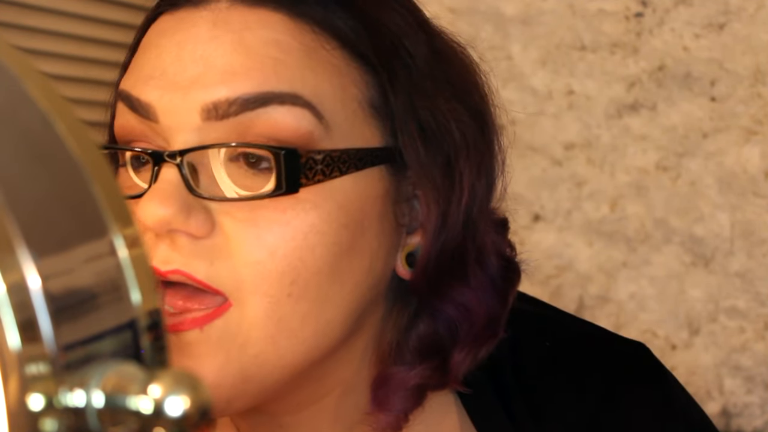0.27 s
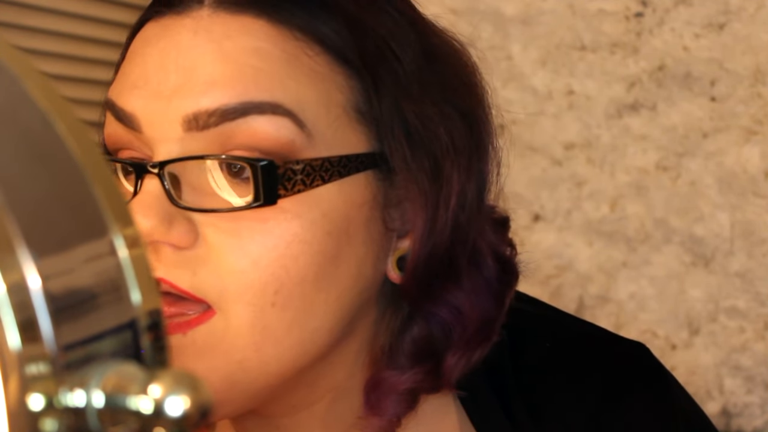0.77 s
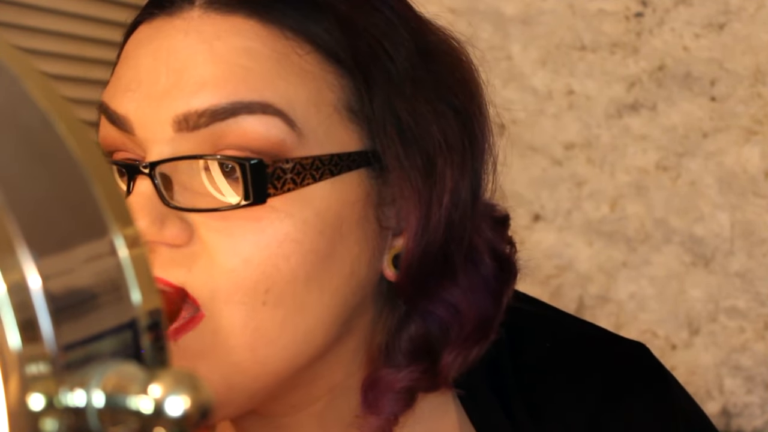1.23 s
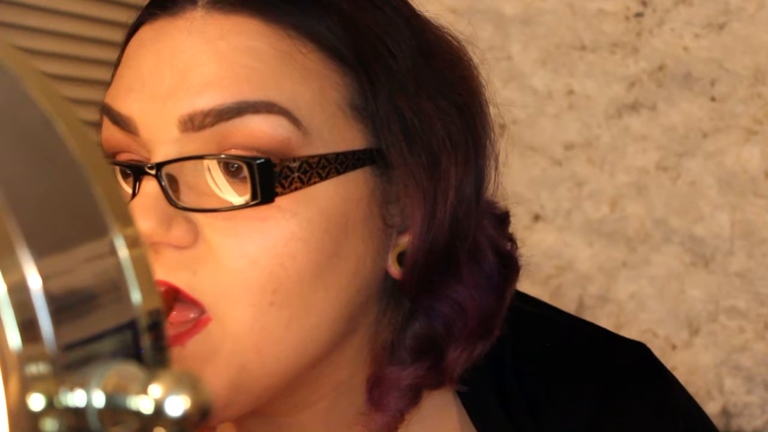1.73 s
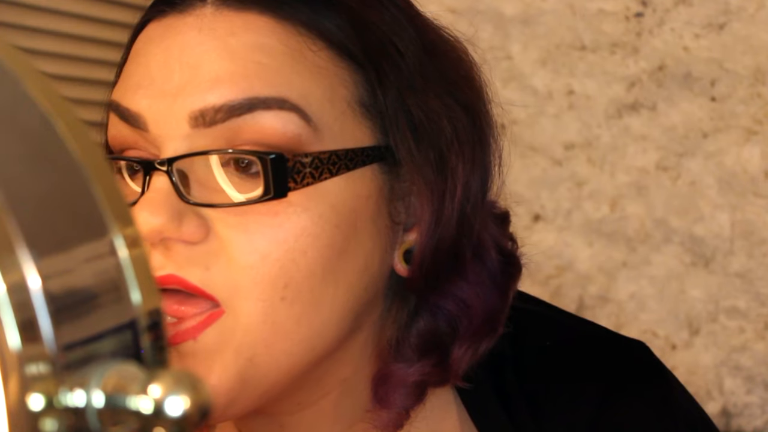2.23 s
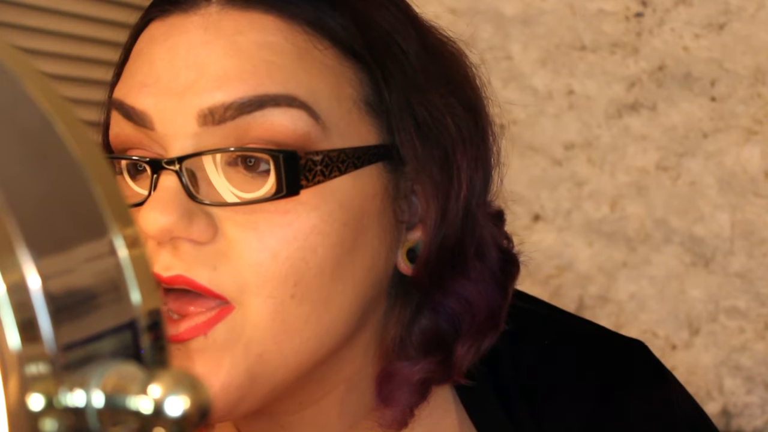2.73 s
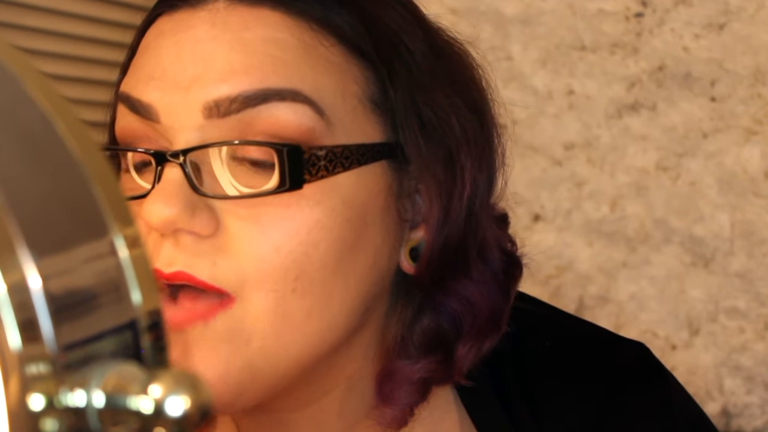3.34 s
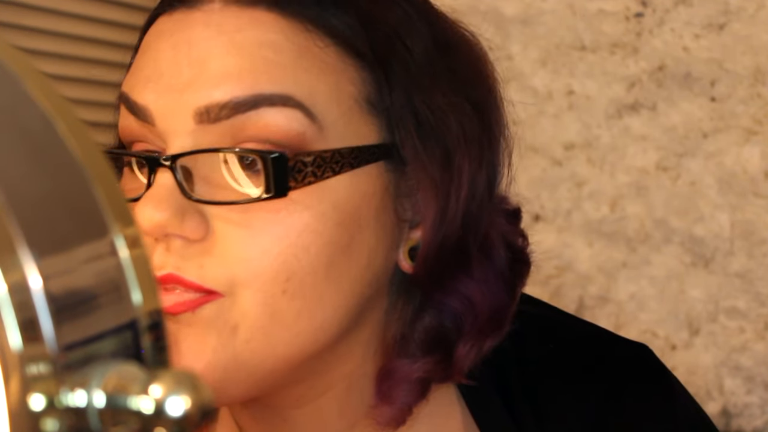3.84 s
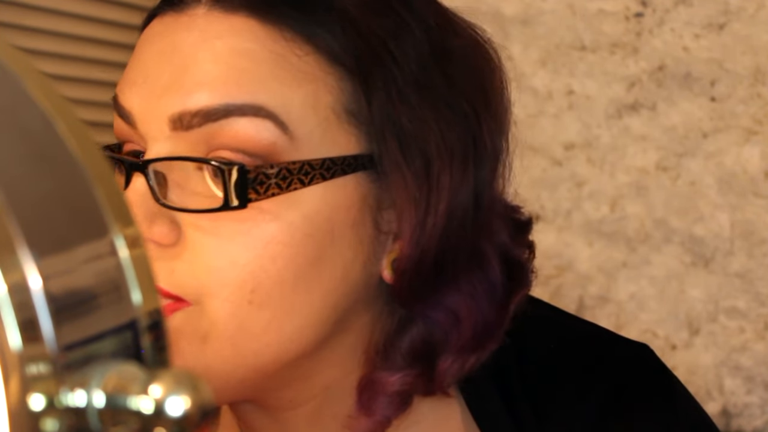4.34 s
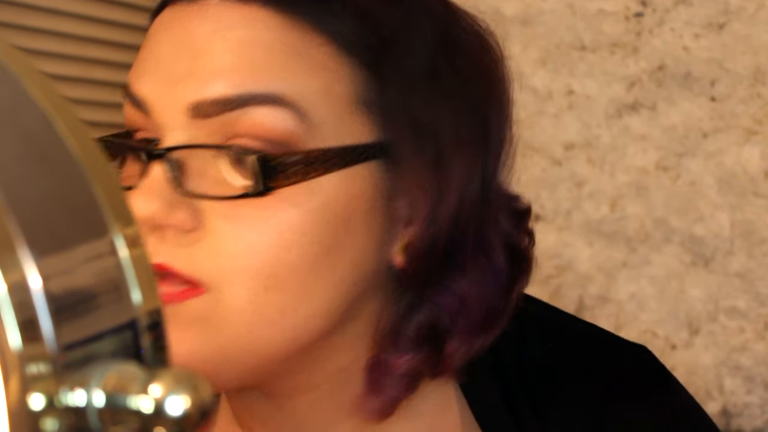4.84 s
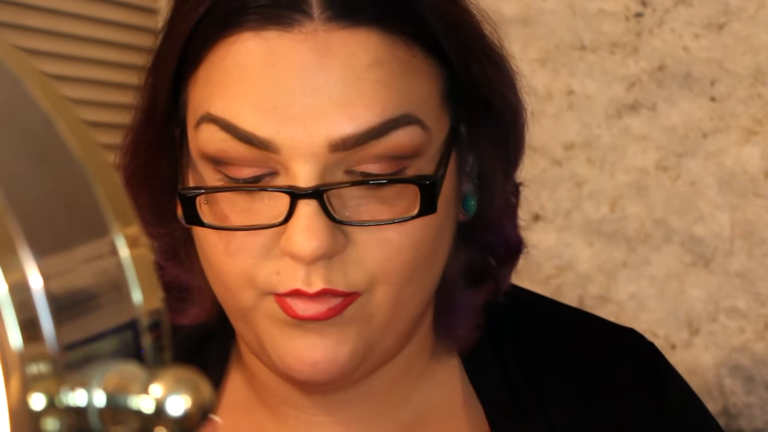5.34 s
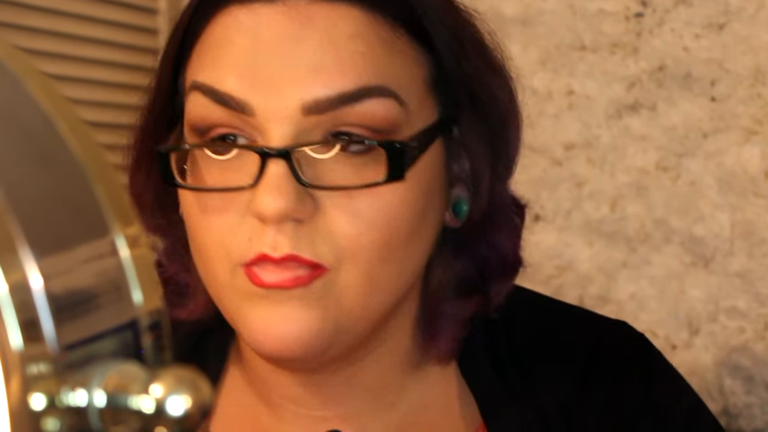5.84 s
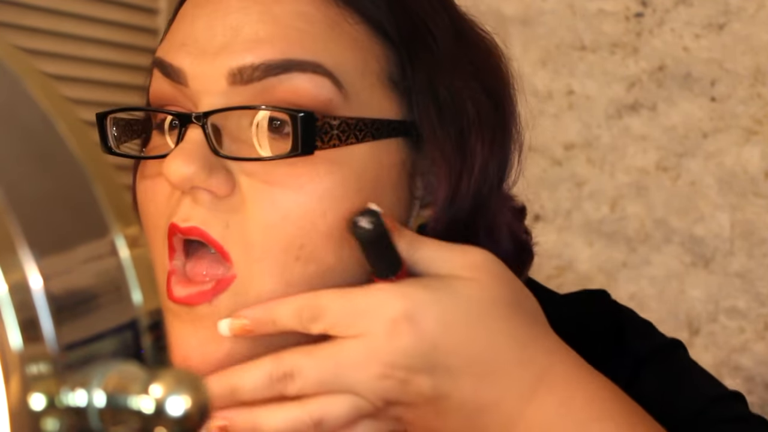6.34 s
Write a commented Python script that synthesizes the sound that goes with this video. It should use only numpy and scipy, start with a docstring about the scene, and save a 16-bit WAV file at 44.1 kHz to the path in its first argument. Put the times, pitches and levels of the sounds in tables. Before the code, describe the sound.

Faint plastic clicks and taps over steady room hiss, then a busier cluster, one sharp loud knock on a table, and soft hand brushing.

```python
"""Small plastic make-up containers are handled at a table in a quiet room, heard by one microphone.
One is set down with a sharp knock: contacts excite decaying modes. Pots and caps tap: crack plus damped ring.
A case snaps lightly: chatter through its resonances. Soft bumps thud on the table; fingernails tick on a cap.
A hand brushes past in four strokes of friction noise. Steady hiss, low rumble and a faint fan whine lie below."""
import sys
import numpy as np
from scipy import signal
from scipy.fft import rfft, irfft
from scipy.io import wavfile
from scipy.ndimage import uniform_filter1d

SR = 44100
rng = np.random.default_rng(int(sys.argv[2]) if len(sys.argv) > 2 else 0)


def bounce(signal):
    """Save signal as a 16-bit WAV file at the path given by the first command-line argument."""
    frames = np.transpose(np.atleast_2d(signal))
    limited = np.clip(frames, -1, 1)
    pcm = np.round(limited * 32767).astype(np.int16)
    wavfile.write(sys.argv[1], SR, pcm)


N = 290707
TIME_S = np.arange(N) / SR
EVENT_N = SR // 2   # samples in half a second
CUTOFF_HZ = 15500

# Hiss colour, relative: f/Hz, density/dB per Hz
HISS_COLOUR = [(88, -45), (145, -22), (178, -6.5), (215, -9), (290, -6.5), (450, -6.5), (800, -6),
               (1150, -6), (2200, -10), (3000, -10.5), (4100, -14), (4900, -14.5), (6700, -17.5),
               (9500, -22), (13000, -26.5), (15500, -30.5)]
# Rumble colour, relative: f/Hz, density/dB per Hz
RUMBLE_COLOUR = [(15, -17), (30, -16), (45, -3.5), (58, 2), (72, -3.5), (90, -10), (105, -0.5), (125, -1.5),
                 (150, -1), (200, -25.5)]
# Fan tones: f/Hz, rms level/dB
FAN_TONES = [(90.5, -80), (452, -82.5), (603.3, -68.5)]
# Hand and sleeve strokes: start/s, length/s, level/dB, fibre catches relative to friction/dB
STROKES = [(4.82, 0.37, -60, -2), (5.66, 0.11, -54.5, 5), (5.922, 0.047, -57, 9), (6.116, 0.11, -54, 14.5)]
# Friction colour, relative: f/Hz, density/dB per Hz
FRICTION_COLOUR = [(120, -23), (300, 6), (700, 2), (1500, 2.5), (2500, 0.5), (3500, 0.5), (4600, -1),
                   (6500, -10.5), (8800, -8.5), (12000, -24), (15500, -31)]
# Fingernails on a cap: t/s, level/dB, centre f/Hz
NAIL_TICKS = [(0.0073, -46.5, 5530), (5.993, -51, 11000), (6.096, -40.5, 7700), (6.25, -56.5, 8500)]
# Soft bumps against the table: t/s, level/dB
TABLE_BUMPS = [(3.3727, -38.5), (3.396, -46.5), (4.853, -43), (5.717, -37.5), (5.7492, -34.5),
               (5.967, -41.5)]
# Light snaps of one plastic case: t/s, level before body gain/dB, contact T60/s, treble tilt/dB per octave
CASE_SNAPS = [(0.9327, -46.5, 0.065, 0.5), (2.5481, -42.5, 0.062, -.5), (3.116, -50.5, 0.052, 1),
              (4.9387, -43, 0.052, 0)]
# Resonances of that case: f/Hz, width/Hz, level before tilt/dB
CASE_MODES = [(450, 360, -11), (1340, 1000, -2.5), (2090, 310, 5), (2630, 600, -1.5), (3910, 320, 2),
              (4750, 390, -1.5), (6640, 1300, -5), (9050, 590, -1), (11800, 2800, -17)]
# Pots and caps touching: t/s, ring level/dB, ring f/Hz, crack level/dB, crack centre f/Hz, crack T60/s
POT_TAPS = [(1.306, -49, 2930, -46, 3600, 0.018), (1.3147, -45, 2970, -44, 3200, .012),
            (3.368, -46.5, 900, -44, 2900, 0.036), (3.3954, -46, 1400, -38, 4700, .014),
            (3.6486, -55, 2170, -49, 2580, 0.036), (4.8505, -43.5, 1120, -42.5, 2700, .03),
            (5.6334, -38.5, 1600, -44, 6800, 0.024), (5.6690, -31.5, 1520, -40.5, 6840, .012),
            (5.688, -40, 1420, -50, 7000, 0.027), (5.7160, -40, 1600, -37, 3760, 0.024),
            (5.9575, -39.5, 2060, -41, 1900, 0.075)]
# Container set down, rim first, then flat, with a small bounce: t/s, level/dB
KNOCK_CONTACTS = [(5.775, -26), (5.7762, -3), (5.7775, -9), (5.7813, -26.5)]
# Container body and table under it: f/Hz, level/dB, decay T60/s
KNOCK_MODES = [(263, -28.5, 0.0098), (378, -18.5, 0.022), (685, -47, 0.0067), (1140, -33, 0.0058),
               (1580, -13, 0.0065), (2270, -14.5, 0.014), (2880, -18, 0.0092), (3443, -10, 0.015),
               (4890, -24, 0.016), (6230, -19, 0.0039), (7350, -16.5, 0.0052), (9070, -10, 0.0026)]
# Shell and table ringing on: f/Hz, level/dB, decay T60/s
SHELL_MODES = [(337, -47, 0.17), (1007, -47, 0.11), (1720, -46, 0.088), (2110, -46, 0.086),
               (2320, -38, 0.1), (2380, -51, 0.095), (2500, -52, 0.29), (2757, -40, 0.079),
               (2850, -45, 0.15), (3560, -53, 0.085)]
# Colour of the table clutter's shiver, relative: f/Hz, density/dB per Hz
SHIVER_COLOUR = [(120, -34), (180, -15), (400, -11), (650, -21), (1050, -7), (1800, -7), (2200, -4.5),
                 (2800, 5), (3300, -14), (4200, -16.5), (6000, -16.5), (8500, -19), (11000, -20),
                 (15500, -40)]
# Reflections off table top and mirror: delay/s, level/dB
ECHOES = [(.0043, -8.5), (.0071, -16.5)]


def from_db(db):
    """Decibels to gain."""
    return 10 ** (np.asarray(db) / 20)


def rms_one(x):
    """Scale to unit rms."""
    return x / np.sqrt(np.mean(x ** 2) + 1e-20)


def noise(colour):
    """Steady noise of rms 1, its spectrum interpolated over log frequency."""
    hz, db = np.transpose(colour)
    bins_hz = np.maximum(np.fft.rfftfreq(N, 1 / SR), 1)
    gain = from_db(np.interp(np.log(bins_hz), np.log(hz), db))
    spectrum = rfft(rng.standard_normal(N)) * gain
    return rms_one(irfft(spectrum, N))


def fade(t60_s):
    """Half a second of exponential decay, falling 60 dB in t60_s."""
    return np.exp(-np.log(1000) * TIME_S[:EVENT_N] / t60_s)


def resonate(x, hz, width_hz):
    """Two-pole resonance with gain 1 at its peak."""
    b, a = signal.iirpeak(hz, hz / min(width_hz, SR / 3), fs=SR)
    return signal.lfilter(b, a, x)


def ring(hz, t60_s):
    """A struck mode; it radiates poorly far from its own pitch."""
    tone = np.sin(2 * np.pi * hz * TIME_S[:EVENT_N]) * fade(t60_s)
    return resonate(tone + 1e-18, hz, 2 * hz)


def ring_modes(modes):
    """Modes struck together, with alternating sign."""
    return sum((-1) ** k * from_db(db) * ring(hz, t60_s) for k, (hz, db, t60_s) in enumerate(modes))


def chatter(t60_s):
    """Countless tiny contacts of either sign, dying away as two surfaces settle."""
    return rng.choice([-1, 1], EVENT_N) * fade(t60_s) + 1e-18


def crack(hz, t60_s, spread=1.25):
    """Contact chatter, gathered round one broad pitch by two resonances in series."""
    width_hz = spread * hz
    once = resonate(chatter(t60_s), hz, width_hz)
    twice = resonate(once, hz, width_hz)
    return twice * np.sqrt(SR / (np.pi * width_hz))   # offsets the loss in a narrow band


def add(track, s, sound):
    """Mix a sound in at time s."""
    at = round(s * SR)
    track[at:at + len(sound)] += sound[:N - at]


def background(hiss_db=-56, rumble_db=-75, waver_hz=0.68):
    """Even hiss, low rumble, and fan tones whose pitch wavers by waver_hz rms."""
    out = from_db(hiss_db) * noise(HISS_COLOUR) + from_db(rumble_db) * noise(RUMBLE_COLOUR)
    for hz, db in FAN_TONES:
        waver = rms_one(uniform_filter1d(rng.standard_normal(N), size=8000))
        phase = 2 * np.pi * np.cumsum(hz + waver_hz * waver) / SR
        out += np.sqrt(2) * from_db(db) * np.sin(phase)
    return out


def stroke(start_s, length_s, attack_s=0.051, release_s=0.087):
    """A hand gathers speed, slides evenly, then slows to rest; time constants attack_s, release_s."""
    early_s = np.maximum(start_s - TIME_S, 0)
    late_s = np.maximum(TIME_S - start_s - length_s, 0)
    return np.exp(-early_s / attack_s - late_s / release_s)


def brushing(grain_db=1.0, catches_per_s=700, catch_hz=5800):
    """Soft friction noise, with tiny bright ticks where fibres catch and slip."""
    grain = rms_one(uniform_filter1d(rng.standard_normal(N), size=120))
    slips = (rng.random(N) < catches_per_s / SR) * rng.standard_normal(N) + 1e-18
    friction = noise(FRICTION_COLOUR)
    catches = resonate(slips, catch_hz, width_hz=5000)
    out = np.zeros(N)
    for start_s, length_s, db, catch_db in STROKES:
        rub = friction + from_db(catch_db) * catches
        out += from_db(db) * stroke(start_s, length_s) * rub
    return from_db(grain_db * grain) * out


def ticks(t60_s=0.017, spread=0.74):
    """A nail is too light to set the cap ringing: only a thin, bright crack."""
    out = np.zeros(N)
    for s, db, hz in NAIL_TICKS:
        add(out, s, from_db(db) * crack(hz, t60_s, spread))
    return out


def bumps(thud_hz=420, thud_t60_s=0.0098, rattle_db=-10, rattle_hz=520, rattle_t60_s=0.043):
    """The table answers every bump with the same dull thud and a low rattle."""
    out = np.zeros(N)
    for s, db in TABLE_BUMPS:
        rattle = from_db(rattle_db) * crack(rattle_hz, rattle_t60_s, spread=2.0)
        add(out, s, from_db(db) * (ring(thud_hz, thud_t60_s) + rattle))
    return out


def snaps(body_db=7):
    """Each snap is a brief chatter through the resonances of the case."""
    out = np.zeros(N)
    pivot_hz = CASE_MODES[1][0]   # treble tilt turns about this mode
    for s, db, t60_s, tilt_db in CASE_SNAPS:
        push = chatter(t60_s)
        body = np.zeros(EVENT_N)
        for k, (hz, width_hz, mode_db) in enumerate(CASE_MODES):
            gain = from_db(mode_db + tilt_db * np.log2(hz / pivot_hz))
            body += (-1) ** k * gain * resonate(push, hz, width_hz)
        add(out, s, from_db(db + body_db) * body)
    return out


def taps(rattle_db=-8.0, ring_cycles=21.7):
    """Held in the fingers, each piece cracks and rings, damped by 60 dB in ring_cycles, with a slight rattle."""
    out = np.zeros(N)
    for s, ring_db, hz, crack_db, crack_hz, crack_t60_s in POT_TAPS:
        t60_s = ring_cycles / hz
        body = ring(hz, t60_s) + from_db(rattle_db) * crack(hz, t60_s, spread=1.0)
        contact = crack(crack_hz, crack_t60_s)
        add(out, s, from_db(ring_db) * body + from_db(crack_db) * contact)
    return out


def knock(crack_db=-22, shiver_db=-28, shiver_t60_s=0.12, contact_hz=11000):
    """Each contact thumps the body; the hardest also sets the shell ringing and the table's clutter shivering."""
    body = ring_modes(KNOCK_MODES)
    shell = ring_modes(SHELL_MODES)
    shiver = noise(SHIVER_COLOUR)[:EVENT_N] * (fade(shiver_t60_s) - fade(0.0059))   # soft onset
    out = np.zeros(N)
    for s, db in KNOCK_CONTACTS:
        add(out, s, from_db(db) * (body + from_db(crack_db) * crack(hz=7600, t60_s=0.021)))
    hardest_s = max(KNOCK_CONTACTS, key=lambda contact: contact[1])[0]
    add(out, hardest_s, shell + from_db(shiver_db) * shiver)
    # plastic yields on contact, which rounds off the highest treble
    return signal.sosfilt(signal.butter(2, contact_hz, fs=SR, output="sos"), out)


def low_cut(x, lowest_hz=175):
    """A steep low cut thins the handling sounds below about lowest_hz."""
    return signal.sosfilt(signal.butter(4, lowest_hz, "high", fs=SR, output="sos"), x)


def room(x, wet_db=-15, t60_s=0.17, dull_hz=7000):
    """Two close reflections and a short, soft tail."""
    b, a = signal.butter(1, dull_hz, fs=SR)
    tail = signal.lfilter(b, a, rng.standard_normal(EVENT_N))
    tail *= fade(t60_s) - fade(0.038)   # soft onset
    response = from_db(wet_db) * tail / np.linalg.norm(tail)
    response[0] += 1   # adds to the direct sound returned below
    for delay_s, db in ECHOES:
        response[round(delay_s * SR)] += from_db(db)
    return x + signal.fftconvolve(x, response)[:N]


def scene():
    """One microphone feeds both channels."""
    handling = snaps() + taps() + bumps() + ticks() + knock()
    mono = background() + brushing() + room(low_cut(handling))
    return np.stack([mono, mono])


def record(dry, top_hz=12500):
    """The microphone loses the highest treble, then a steep filter cuts the top."""
    soft = signal.sosfilt(signal.butter(2, top_hz, fs=SR, output="sos"), dry)
    return signal.sosfilt(signal.ellip(10, 0.1, 80, CUTOFF_HZ, fs=SR, output="sos"), soft)


dry = scene()
out = record(dry)
bounce(out)
```